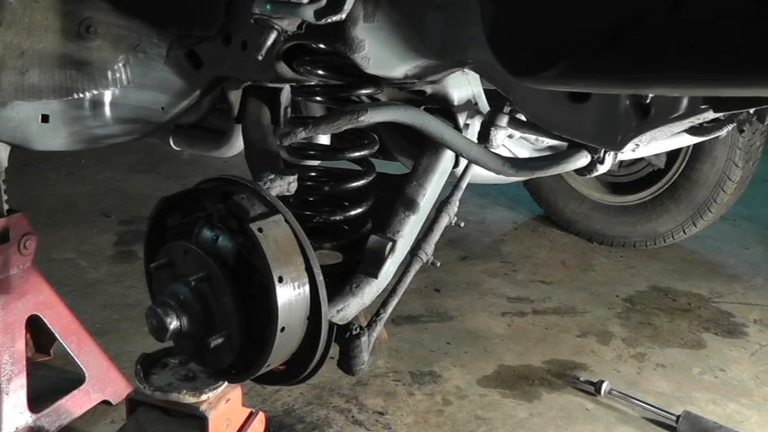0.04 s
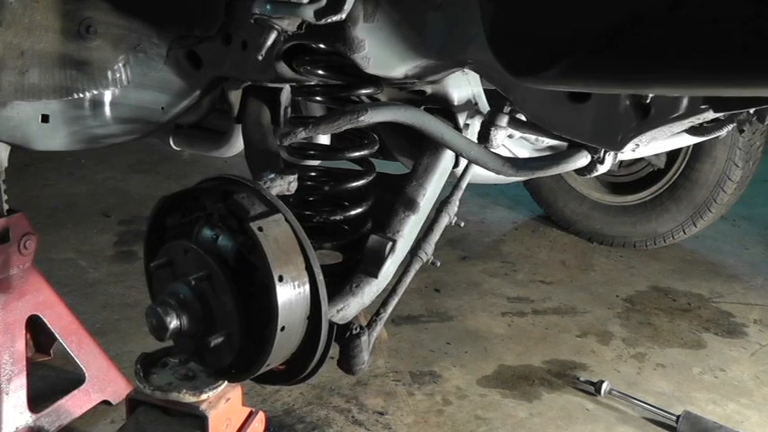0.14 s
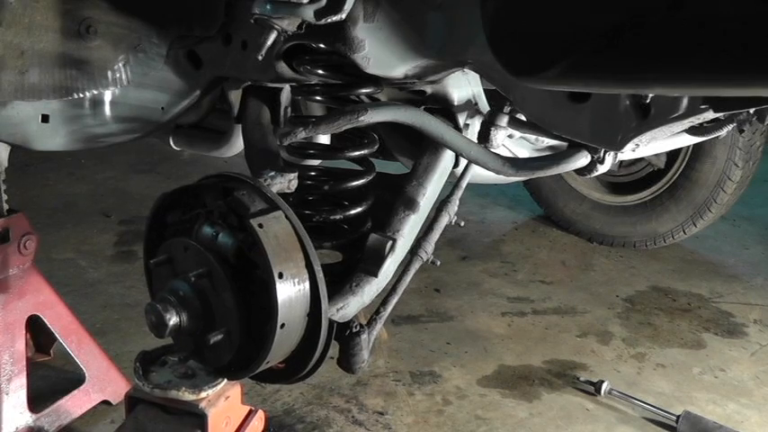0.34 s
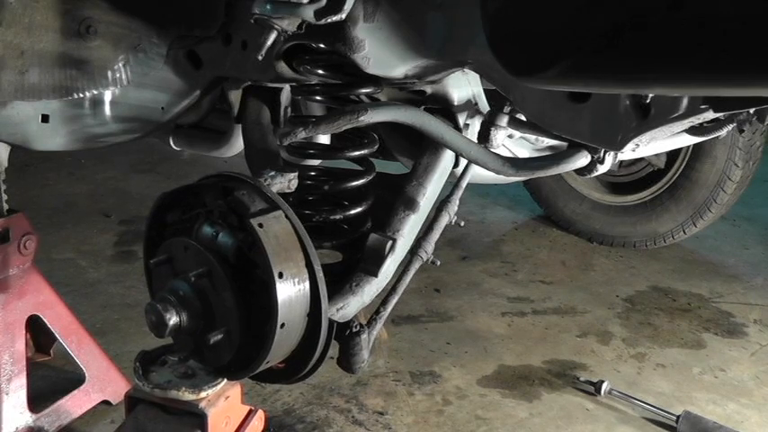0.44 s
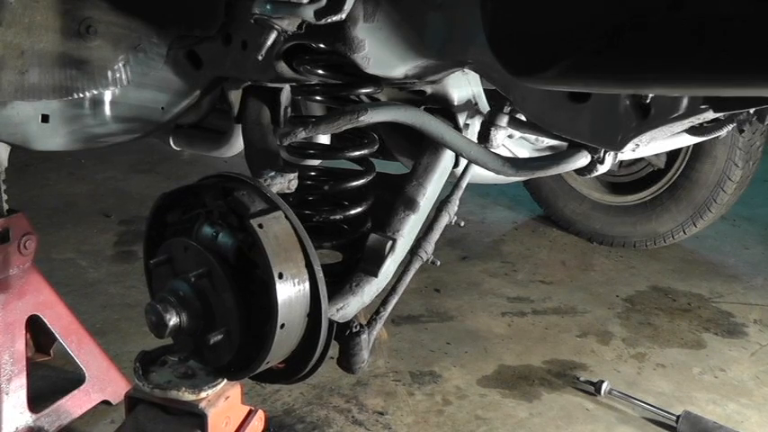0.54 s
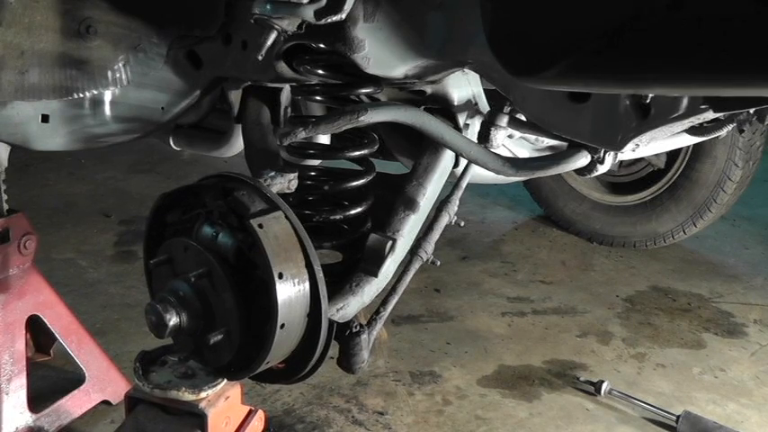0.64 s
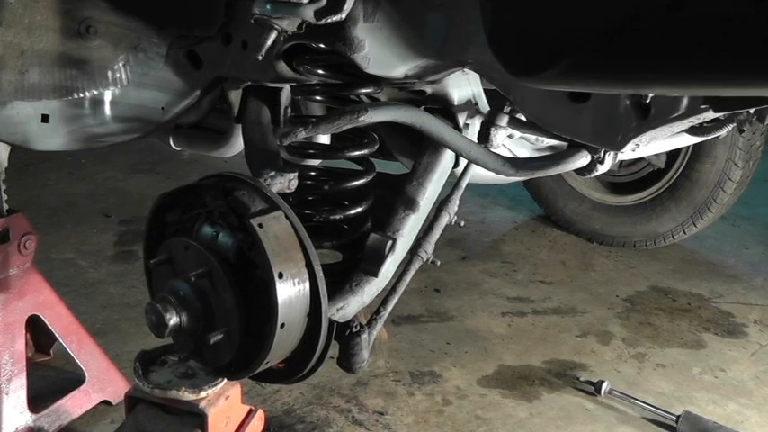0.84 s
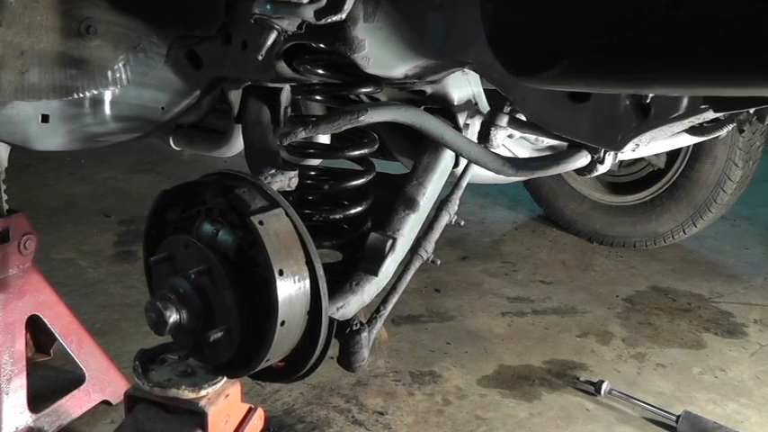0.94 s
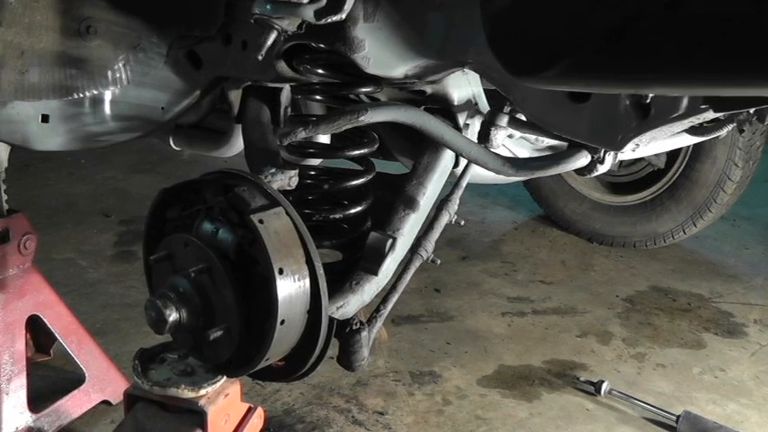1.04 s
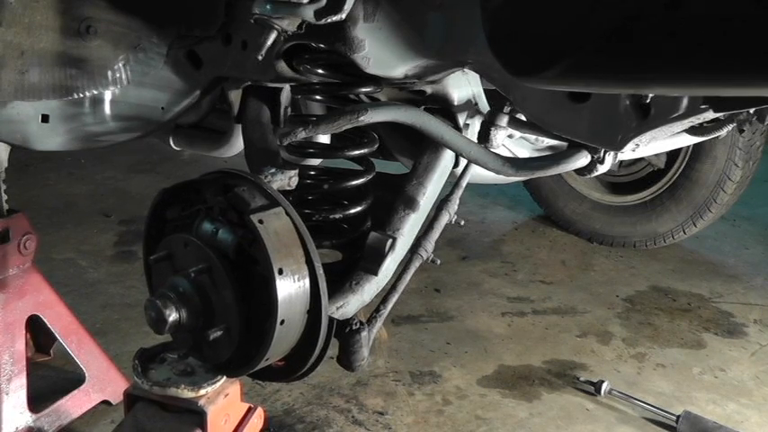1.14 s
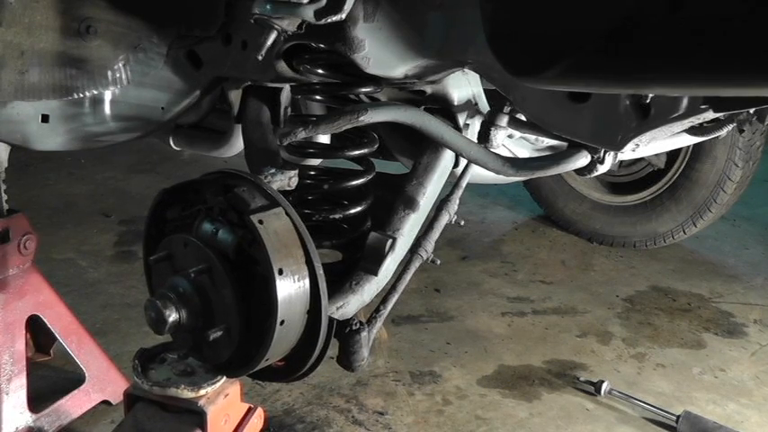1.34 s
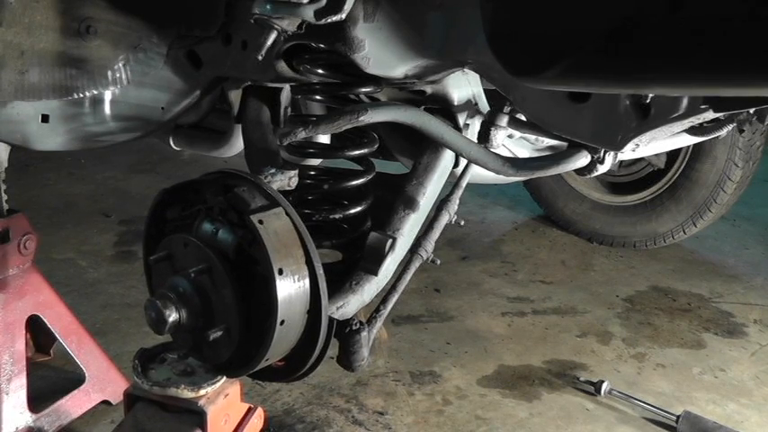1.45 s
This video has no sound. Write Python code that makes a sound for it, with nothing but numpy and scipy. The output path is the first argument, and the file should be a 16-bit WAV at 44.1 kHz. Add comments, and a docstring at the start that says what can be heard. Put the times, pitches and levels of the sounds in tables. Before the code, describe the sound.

A jack's dry metal pivot squeals twice, high-pitched, amid clinks and clunks in a garage.

```python
"""A low axle rumble and a few steel clinks open the scene, close by in a quiet garage, as a floor
jack is worked by hand under a car's suspension. On each of two strokes a dry pivot squeals on one
high note by stick-slip friction; in the second, slips that recur only every few cycles add a
buzzing chatter of subharmonics. Each squeal stops and its echo fades unevenly in the room.
Around the squeals the linkage clinks, scrapes and clunks, and there are a few dull, low pops."""
import sys
import numpy as np
from scipy import signal
from scipy.fft import irfft
from scipy.io import wavfile

SR = 44100
rng = np.random.default_rng(int(sys.argv[2]) if len(sys.argv) > 2 else 0)


def wrap_up_sound(samples):
    """Save the sound to the file named by the first command line argument, as 16-bit audio."""
    columns = np.atleast_2d(samples).T
    # keep every value between -1 and 1, then stretch to whole-number steps
    tamed = np.clip(columns, -1, 1)
    steps = np.round(tamed * 32767).astype(np.int16)
    wavfile.write(sys.argv[1], SR, steps)


N = 66150
T = np.arange(N) / SR
SWING_HZ = 47.4  # bandwidth of the flicker in the pivot's partials
# spectrum of sliding metal: frequency_hz, relative_db
FRICTION_SPECTRUM = [(200, 5), (600, 2), (1500, 4), (2500, -1), (4500, -1), (6600, 2), (9000, 0),
                     (12000, -6), (15500, -15.5)]


def amp(db):
    """Amplitude ratio of a level in decibels."""
    return 10 ** (np.asarray(db) / 20)


def unit(x):
    """Normalisation to rms 1."""
    return x / np.sqrt(np.mean(x ** 2) + 1e-20)


def level(points):
    """Gain interpolated through (time_s, level_db) points, silent outside them."""
    return amp(np.interp(T, *np.transpose(points), left=-120, right=-120))


def band(x, lo_hz, hi_hz):
    """Causal band-pass filter."""
    edges_hz = [lo_hz, min(hi_hz, SR / 2 - 500)]
    return signal.sosfilt(signal.butter(2, edges_hz, btype="band", fs=SR, output="sos"), x)


def noise(gain):
    """Random-phase noise of rms 1 with the amplitude spectrum gain(frequency_hz)."""
    spectrum = gain(np.fft.rfftfreq(N, 1 / SR)) * np.exp(2j * np.pi * rng.random(N // 2 + 1))
    return unit(irfft(spectrum, N))


def coloured(points):
    """Noise whose spectral envelope follows (frequency_hz, relative_db) points."""
    hz, db = np.transpose(points)
    return noise(lambda f: amp(np.interp(np.log(f + 1), np.log(hz), db)))


def drift(rate_hz):
    """Low-pass random fluctuation of rms 1."""
    return noise(lambda f: np.exp(-(f / rate_hz) ** 2) * (f > 0))


def envelope(start_s, rise_s, decay_s, hold_until_s=0):
    """Linear attack, optional hold, exponential decay."""
    decaying_s = np.maximum(T - max(start_s + rise_s, hold_until_s), 0)
    return np.clip((T - start_s) / rise_s, 0, 1) * np.exp(-decaying_s / decay_s)


def axle_rumble():
    """Resonance under broadband forcing: the loaded suspension rumbles and rings the underbody."""
    loudness = [(0, -28), (.08, -37), (.125, -33), (.2, -30), (.27, -42), (.36, -30), (.44, -28.5),
                (.52, -35), (.6, -32), (.72, -44), (.85, -42), (.9, -26), (.97, -53), (1.14, -43),
                (1.2, -32), (1.29, -36.5), (1.36, -44.5), (1.5, -44.5)]  # time_s, level_db
    spectrum = [(15, -1), (35, -4.5), (65, 4), (110, 4), (180, -7), (260, -11.5), (450, -14), (700, -22),
                (1500, -31.5), (4000, -58)]  # frequency_hz, relative_db
    underbody_modes = [(103.7, 10, -10), (172.7, 5.8, -6.5), (227, 15, -23), (305.8, 2.6, -18.5),
                       (408.4, 1.9, -16)]  # centre_hz, half_width_hz, relative_db
    hollow = sum(amp(db) * noise(lambda f: 1 / (1 + ((f - hz) / width) ** 2))
                 for hz, width, db in underbody_modes)
    return level(loudness) * (coloured(spectrum) + hollow)


def sliding_hiss():
    """Friction noise: metal sliding under load gives a faint, grainy hiss."""
    loudness = [(0, -43.5), (.11, -40), (.2, -41.5), (.3, -42.5), (.4, -40.5), (.47, -39.5), (.53, -35),
                (.6, -44.5), (.7, -54), (.83, -52), (.92, -49), (1.1, -45.5), (1.27, -46), (1.38, -56.5),
                (1.5, -54.5)]  # time_s, level_db
    return level(loudness) * unit(coloured(FRICTION_SPECTRUM) * amp(2 * drift(400)))


def ringing(modes, blows):
    """Modal superposition: each blow excites a set of exponentially decaying sinusoids."""
    out = np.zeros(N)
    for start, blow_db in blows:
        t = np.maximum(T - start, 0)
        for hz, db, t60 in modes:
            out += amp(blow_db + db - 60 * t / t60) * np.sin(2 * np.pi * hz * t)
    return out


def link_clinks():
    """Free vibration: a small steel link, when struck, rings in high inharmonic modes."""
    modes = [(1529, -21, .1), (2159, -20, .08), (3558, -15, .1), (4570, -9, .08), (6565, 0, .12),
             (6960, -1, .12), (7790, -12, .08), (8323, -1, .11), (10600, -16, .07)]  # pitch_hz, relative_db, t60_s
    blows = [(0.022, -33.5), (.057, -30.5), (.4152, -16), (0.4327, -23), (0.588, -38), (1.252, -38)]  # start_s, level_db
    return ringing(modes, blows)


def linkage_knocks():
    """Impact noise: each knock or scrape is a brief, gritty burst with a broad spectrum."""
    # start_s, rise_s, decay_s, bass_db, body_db, middle_db, treble_db, top_db
    contacts = [(0.024, 0.0018, 0.007, -20.5, -56, -58, -33.5, -51),
                (0.055, 0.0015, 0.0041, -40, -41, -32, -18, -19),
                (0.0946, 0.0008, 0.0069, -26.5, -40, -25.5, -21, -34),
                (0.11, 0.00069, 0.014, -20.5, -30, -34.5, -58, -52),
                (.402, .00085, .0024, -17, -27, -30, -25, -40),
                (0.4148, 0.00018, 0.0021, -6, -20, -15, -1.5, -9),
                (.4338, .0002, .0012, -28, -30, -14, -12, -21),
                (0.457, 0.0068, 0.0078, -18, -27.5, -29.5, -27, -33.5),
                (.534, 0.00069, 0.0036, -51, -20, -57, -50, -54),
                (.573, .0004, .006, -27, -27, -28, -44, -52),
                (0.586, 0.0027, 0.0058, -48, -49, -26, -27, -35.5),
                (0.6018, 0.00025, 0.0057, -37, -30, -26.5, -28.5, -55),
                (0.647, 0.00076, 0.0056, -60, -50, -36.5, -56, -60),
                (0.8558, 0.00038, 0.0082, -63, -54, -34.5, -39, -47),
                (0.87, 0.0027, 0.0026, -20, -27.5, -18, -17.5, -18.5),
                (0.878, 0.0026, 0.013, -21.5, -27.5, -27.5, -30, -52),
                (1.022, 0.018, 0.03, -29, -37.5, -61, -63, -58),
                (1.131, 0.0011, 0.0035, -24, -32.5, -52, -68, -65),
                (1.144, 0.0014, 0.0066, -50, -76, -33.5, -53, -65),
                (1.1735, .0005, .0035, -20, -22, -29, -22.5, -35.5),
                (1.179, .01, .0068, -19, -15.5, -18, -23.5, -27.5),
                (1.201, 0.015, 0.0023, -46, -67, -32, -30, -35),
                (1.2318, 0.0004, 0.0047, -33, -24.5, -26, -61, -56),
                (1.2503, 0.00051, 0.0048, -58, -36, -23, -15.5, -34),
                (1.265, 0.0021, 0.0078, -25, -29, -37, -36, -53),
                (1.338, 0.00065, 0.0036, -50, -54, -47, -42, -76.5)]
    bands = [(45, 196), (260, 776), (1200, 5100), (6200, 9210), (9800, 13200)]  # bass to top: low_hz, high_hz
    out = np.zeros(N)
    for k, (lo, hi) in enumerate(bands):
        grit = rng.standard_normal(N) * np.exp(0.33 * drift(1200))
        grit = unit(band(grit, lo, hi))
        decay_scale = 0.75 if k == 0 else 1  # the bass dies sooner
        for start, rise, decay, *band_db in contacts:
            shape = envelope(start, rise, decay * decay_scale)
            out += amp(band_db[k]) * unit(shape * grit) * np.sqrt(np.mean(shape ** 2))
    return out


def suspension_clunks():
    """Damped oscillation: each loose part sounds one short, hollow pitch."""
    clunks = [(.112, 169.2, -24, 0.014, 0.034), (.4545, 108, -7, .003, .006),
              (0.055, 3840, -21.5, 0.0008, 0.0036), (.345, 840, -26.5, 0.0059, 0.0032),
              (.456, 540, -21.5, 0.004, 0.0027), (.534, 579, -28, 0.0028, 0.0094),
              (.573, 1520, -22.5, 0.00084, 0.0042), (.602, 503, -22, 0.0026, 0.0079),
              (1.022, 50, -25, 0.014, 0.027), (1.1737, 380, -3, .0005, .0008),
              (1.1848, 1530, -12, .0012, .0025), (1.189, 830, -8, .0014, .0025)]  # start_s, pitch_hz, level_db, rise_s, decay_s
    return sum(amp(db) * envelope(start, rise, decay) * np.sin(2 * np.pi * hz * (T - start))
               for start, hz, db, rise, decay in clunks)


def frame_clanks():
    """Free vibration: the jack's struck frame rings lower and more briefly than the link."""
    modes = [(388, -10, .07), (544, -12, .06), (974, -13, .09), (1577, -15, .06), (2020, -5, .02),
             (2860, -8, .025), (3036, -2, .04), (8500, -11, .04)]  # pitch_hz, relative_db, t60_s
    blows = [(0.0954, -20), (0.8752, -9.5)]  # start_s, level_db
    return ringing(modes, blows)


def pivot_phase(pitch_hz, waver):
    """Phase is the integral of frequency, which wanders by the rms fraction waver."""
    return 2 * np.pi * np.cumsum(pitch_hz * (1 + waver * drift(70))) / SR


def swell(points, smoothing_s=.0004):
    """A resonator's amplitude cannot jump, so the corners of its level curve are rounded."""
    pole = np.exp(-1 / (smoothing_s * SR))
    return signal.filtfilt([1 - pole], [1, -pole], level(points))


def squeal(phase, note_levels, octave_levels, flicker_db=2.5, shimmer_db=.3):
    """Self-excited friction oscillation: a nearly pure note with a flickering second harmonic."""
    octave = swell(octave_levels) * amp(flicker_db * drift(SWING_HZ)) * np.sin(2 * phase)
    shimmer = amp(shimmer_db * drift(110))
    return np.sqrt(2) * shimmer * (swell(note_levels) * np.sin(phase) + octave)


def first_stroke():
    """Stick-slip friction: the dry pivot squeals on one high note, whose echo fades unevenly."""
    note_levels = [(.205, -48), (.22, -23), (.232, -11), (.282, -8), (.365, -11), (.404, -14), (.424, -32),
                   (.462, -21.5), (0.494, -21.5), (.575, -33.5), (.605, -49), (.655, -39), (.69, -46),
                   (0.713, -71), (.745, -52.5), (0.868, -54.5)]  # the squeal and its echo: time_s, level_db
    octave_levels = [(0.209, -78), (.22, -27.5), (0.268, -25.5), (.296, -53.5), (.335, -31), (.363, -52),
                     (.405, -40), (.43, -62)]  # time_s, level_db
    phase = pivot_phase(pitch_hz=5706, waver=.0006)
    roughness_rad = .012
    return squeal(phase + roughness_rad * drift(550), note_levels, octave_levels)


def low_pops():
    """Pressure transients: short, dull pops and thumps, each a sudden push with a slower rebound."""
    pulses = [(.2933, .48, .0016), (.4032, -.3, .002), (.416, .4, .002), (.4341, -.5, .0006),
              (.4476, -.42, .0005), (.4572, .45, .0015), (.4587, -.5, .006), (.573, -.22, .002),
              (1.174, .5, .002)]  # start_s, signed_gain, push_length_s
    out = np.zeros(N)
    for start, gain, length in pulses:
        age = np.maximum(T - start, 0) / length
        out += gain * (age > 0) * (1 - age) * np.exp(-age)
    return band(out, 30, 5200)


def subharmonics(phase, partials, cycles, swing_db=2.2, jitter_rad=.15, wander_rad=.3):
    """Slips that repeat every few cycles sound at multiples of the note's frequency / cycles."""
    out = np.zeros(N)
    for harmonic, db in partials:
        gain = amp(db + swing_db * drift(SWING_HZ))
        offset = 2 * np.pi * rng.random() + jitter_rad * drift(210) + wander_rad * drift(SWING_HZ)
        out += gain * np.sin(harmonic * phase / cycles + offset)
    return np.sqrt(2) * out


def slow_chatter(phase, fast_gain):
    """Period multiplication: a slip every 8 cycles buzzes, fluttering against the faster slips."""
    partials = [(1, -47), (2, -24.5), (3, -31), (4, -37.5), (5, -30), (6, -27.5), (7, -47), (9, -29),
                (10, -34), (11, -28), (12, -45), (13, -30), (14, -38), (18, -44), (19, -45), (21, -47),
                (22, -41)]  # harmonic_number, relative_db
    loudness = [(.928, -23), (.937, -2), (.952, 0), (.98, -5.5), (1.026, -10), (1.044, -1), (1.056, -6),
                (1.068, -27)]  # dips while the fast chatter sounds: time_s, level_db
    buzz = subharmonics(phase, partials, cycles=8)
    rasp = amp(-36) * coloured(FRICTION_SPECTRUM)
    alignment = phase / 24 + .3 * drift(60)  # the two slip patterns line up every 24 cycles
    flutter = 1.4 * fast_gain * np.cos(alignment) + np.cos(2 * alignment)
    return level(loudness) * (buzz + rasp) * (1 + .17 * flutter)


def fast_chatter(phase):
    """Period multiplication: a slip every third cycle, in a pattern that repeats every 24."""
    partials = [(4, -42), (8, -30.5), (16, -28), (23, -34.5), (25, -30.5), (32, -35.5), (40, -48),
                (47, -44), (56, -43.5), (62, -50)]  # harmonic_number, level_db
    return subharmonics(phase, partials, cycles=24)


def tail_flutter(start_s, rate_hz=43.7):
    """Amplitude modulation: the squeal's echo in the room flutters in level as it dies away."""
    depth = .4 * envelope(start_s - .01, rise_s=.0096, decay_s=1)
    return 1 - depth * np.cos(2 * np.pi * rate_hz * np.maximum(T - start_s, 0))


def second_stroke(stop_s=1.072):
    """Stick-slip with subharmonics: the pivot bites, chatters and stops; its echo fades unevenly."""
    note_levels = [(0.907, -50), (0.9095, -4.5), (0.923, -17), (.932, -11.5), (.941, -14.5), (.958, -9.5),
                   (1.002, -15), (1.013, -9.5), (1.025, -13), (1.061, -8.5), (1.071, -21.5), (1.118, -28),
                   (1.143, -22.5), (1.163, -35), (1.18, -28), (1.235, -38), (1.275, -37), (1.303, -52),
                   (1.315, -42), (1.41, -51.5), (1.44, -65), (1.5, -56)]  # the squeal and its echo: time_s, level_db
    octave_levels = [(.906, -55), (.912, -24.5), (.94, -29), (.975, -36.5), (1.059, -35), (1.1, -55.5),
                     (1.2, -61)]  # time_s, level_db
    phase = pivot_phase(pitch_hz=5672, waver=.0014)
    fast_gain = envelope(start_s=.96, rise_s=.025, decay_s=.006, hold_until_s=1.04)
    slow_buzz = slow_chatter(phase, fast_gain)
    bite = envelope(start_s=.907, rise_s=.0004, decay_s=.006)
    roughness_rad = .055 * (T < stop_s) + .2 * bite
    note = squeal(phase + roughness_rad * drift(550), note_levels, octave_levels)
    return note * tail_flutter(stop_s), slow_buzz + fast_gain * fast_chatter(phase)


def garage_reverb(x):
    """Reverberation: diffuse reflections die away, the high bands sooner than the low."""
    decay_bands = [(40, 570, 0.72), (523, 3260, 0.65), (2610, 8300, 0.38), (8650, 25000, 0.35)]  # low_hz, high_hz, t60_s
    reflections = rng.standard_normal(N) * (rng.random(N) < .1) * np.clip(T / 0.003, 0, 1)
    tail = sum(band(reflections, lo, hi) * amp(-60 * T / t60) for lo, hi, t60 in decay_bands)
    return signal.fftconvolve(x, tail / np.linalg.norm(tail))[:N]


def scene():
    """Superposition of all sources, alike in both channels; the hits and chatter reverberate."""
    first_squeal = first_stroke()
    second_squeal, chatter = second_stroke()
    hits = linkage_knocks() + suspension_clunks() + link_clinks() + frame_clanks()
    room = garage_reverb(amp(-21.5) * hits + amp(-16) * chatter)
    pivot = first_squeal + second_squeal + chatter
    mono = pivot + hits + low_pops() + axle_rumble() + sliding_hiss() + room
    return np.array([mono, mono])


def record(dry, cutoff_hz=15750):
    """Overload and band limiting: the loudest clink clips, then a low-pass cuts the top treble."""
    low_pass = signal.firwin(511, cutoff_hz, window=("kaiser", 9), fs=SR)
    return signal.oaconvolve(np.clip(dry, -1, 1), low_pass[None], "same")


dry = scene()
out = record(dry)
wrap_up_sound(out)
```